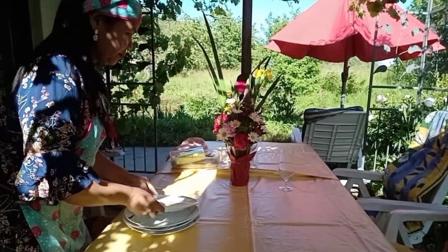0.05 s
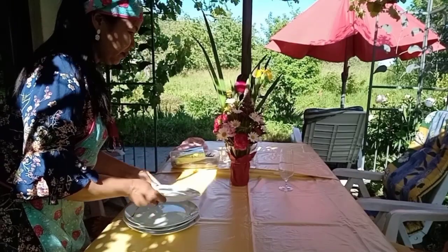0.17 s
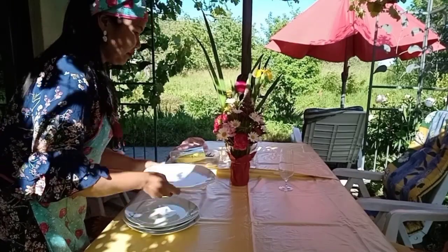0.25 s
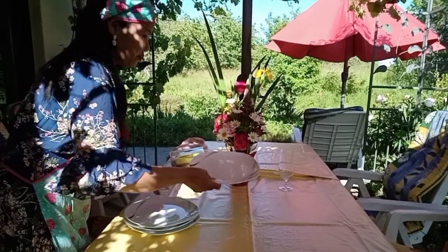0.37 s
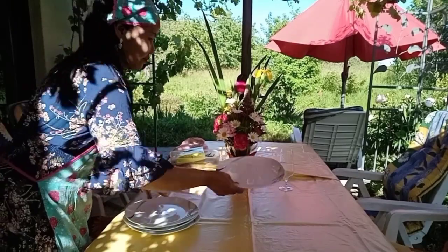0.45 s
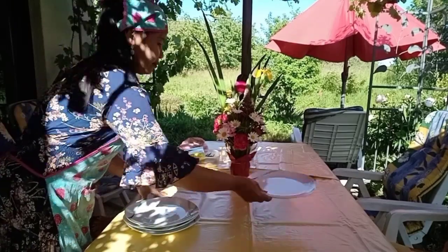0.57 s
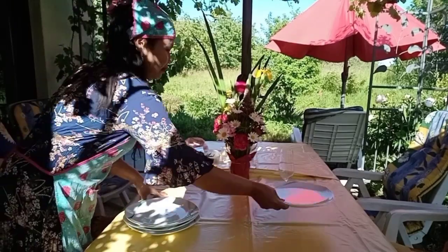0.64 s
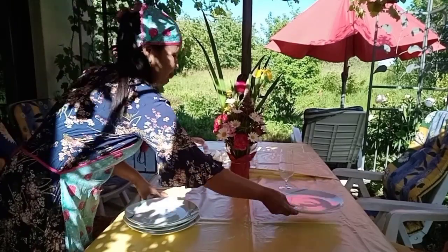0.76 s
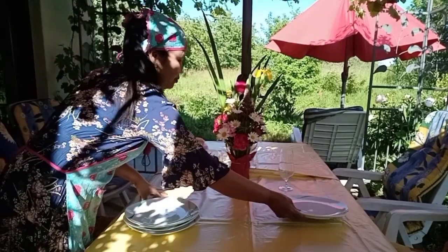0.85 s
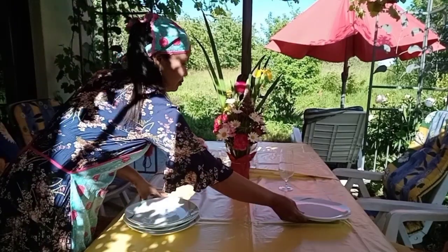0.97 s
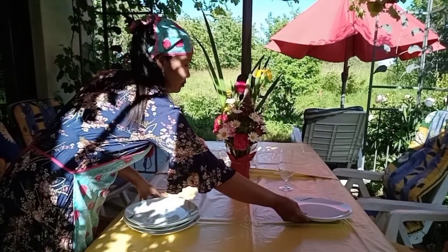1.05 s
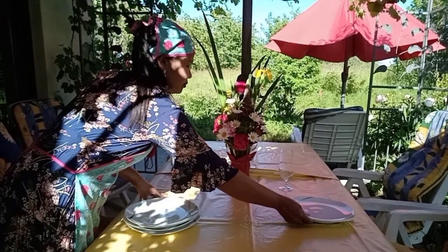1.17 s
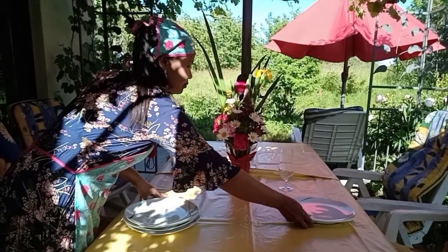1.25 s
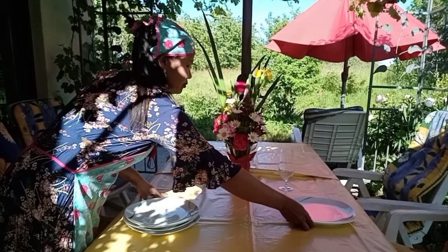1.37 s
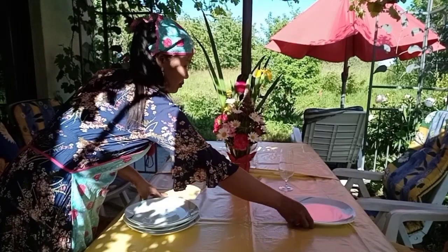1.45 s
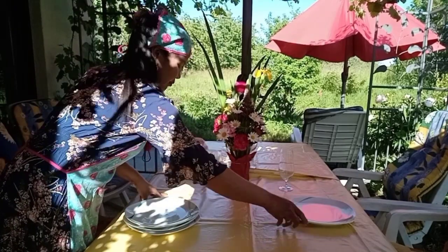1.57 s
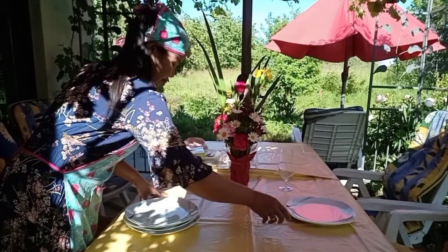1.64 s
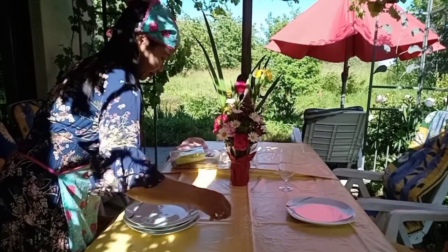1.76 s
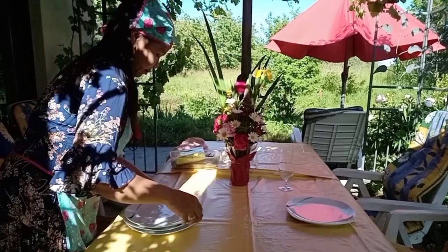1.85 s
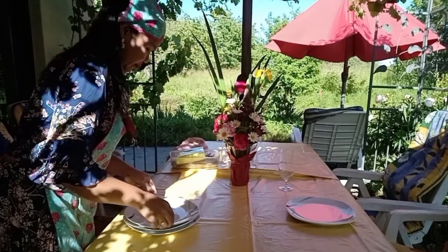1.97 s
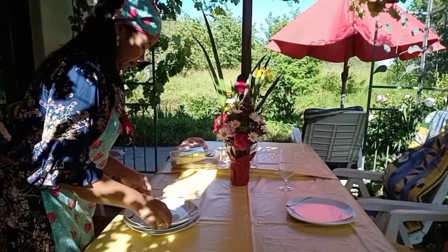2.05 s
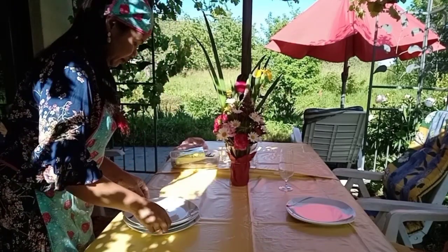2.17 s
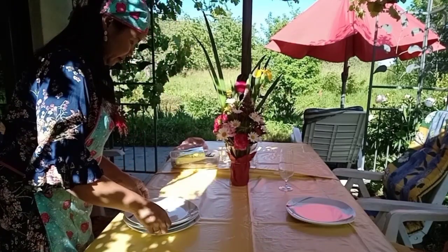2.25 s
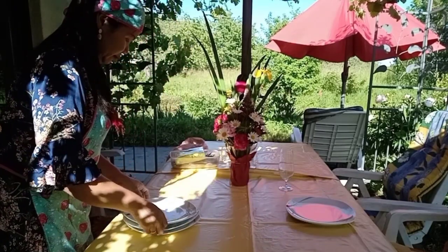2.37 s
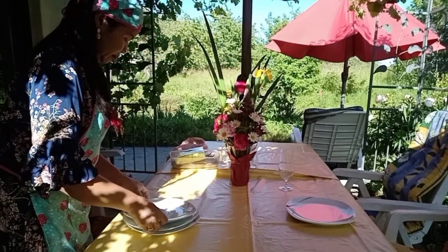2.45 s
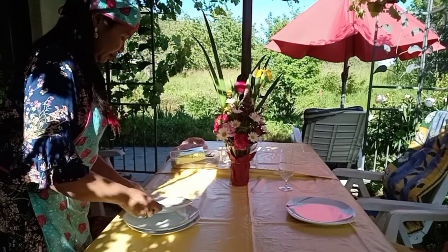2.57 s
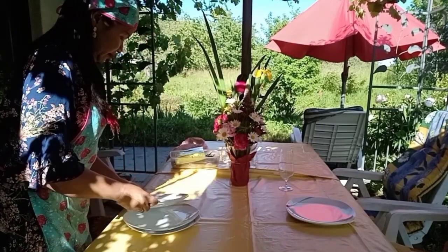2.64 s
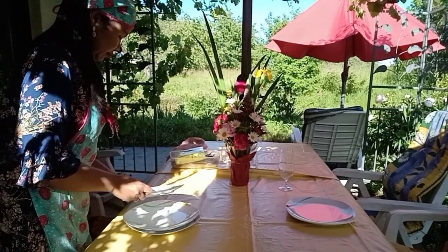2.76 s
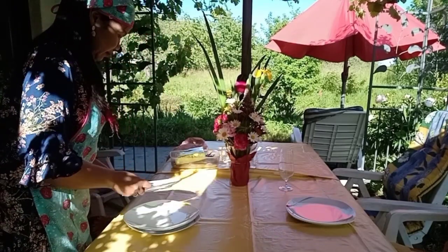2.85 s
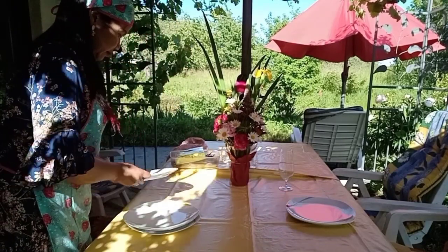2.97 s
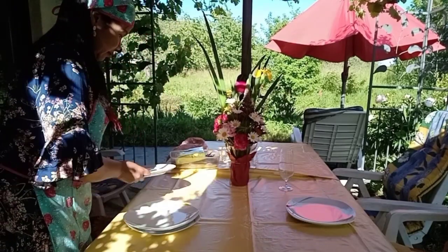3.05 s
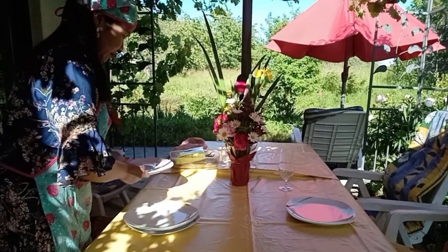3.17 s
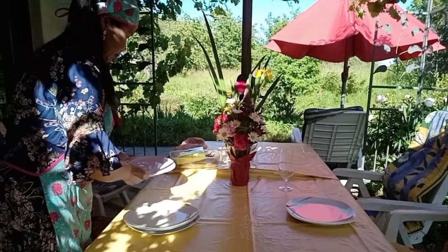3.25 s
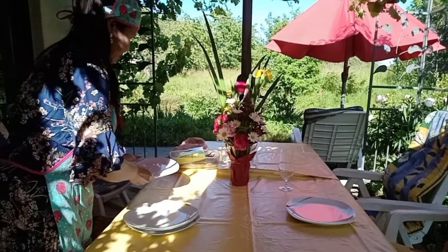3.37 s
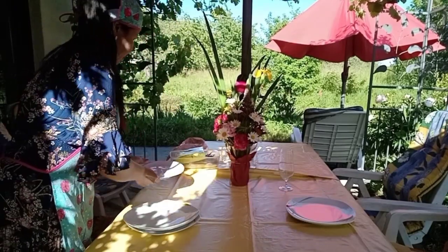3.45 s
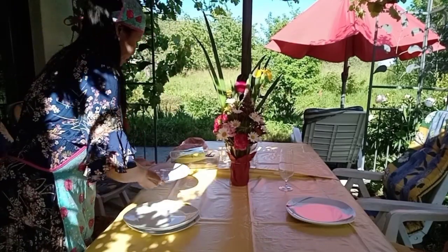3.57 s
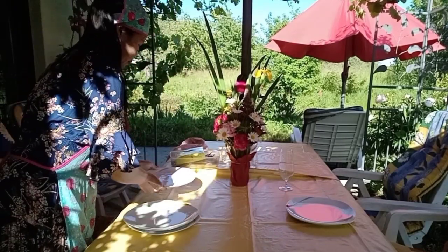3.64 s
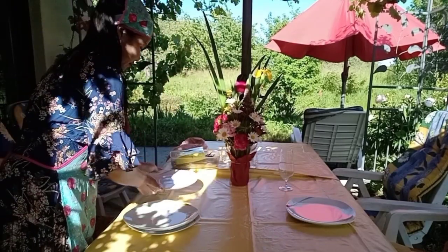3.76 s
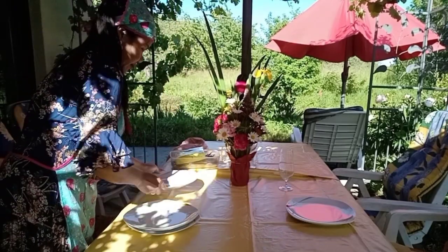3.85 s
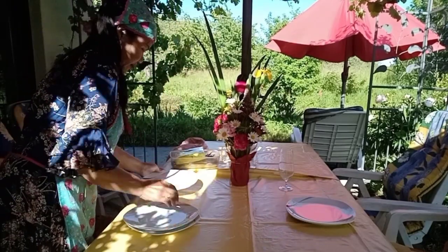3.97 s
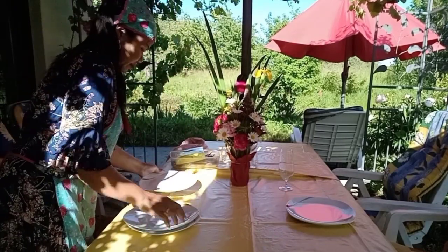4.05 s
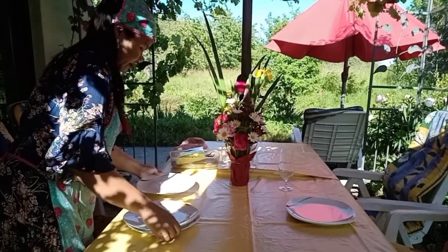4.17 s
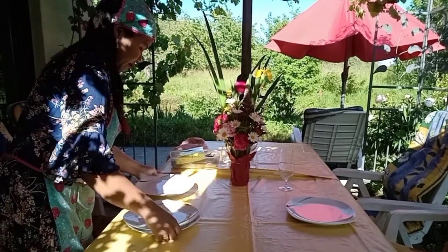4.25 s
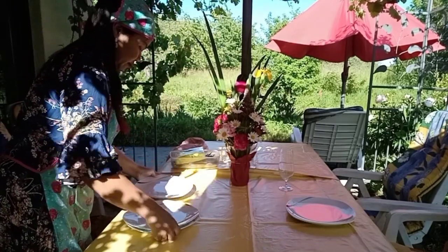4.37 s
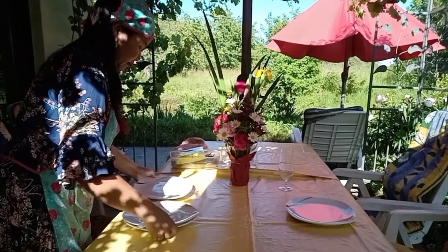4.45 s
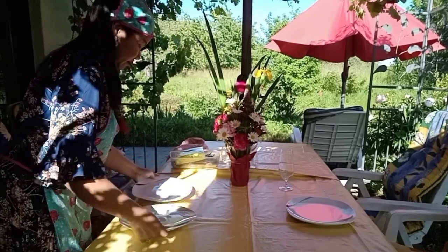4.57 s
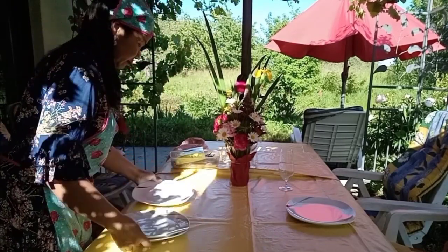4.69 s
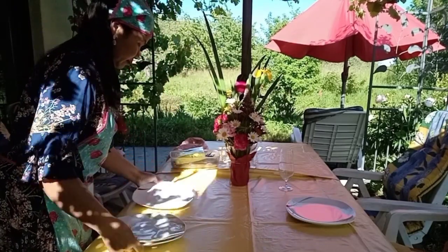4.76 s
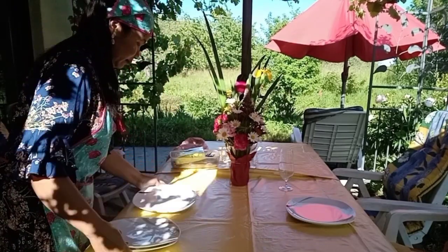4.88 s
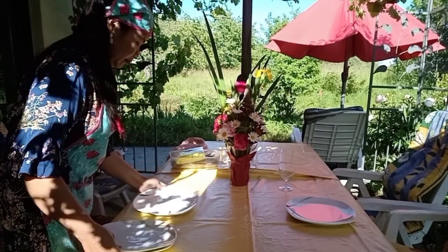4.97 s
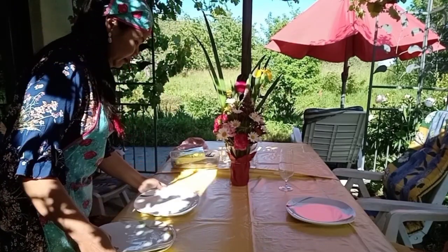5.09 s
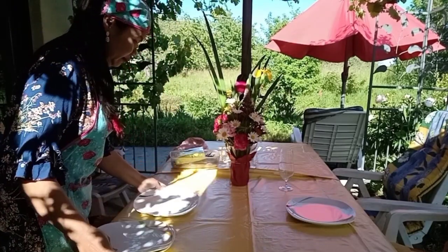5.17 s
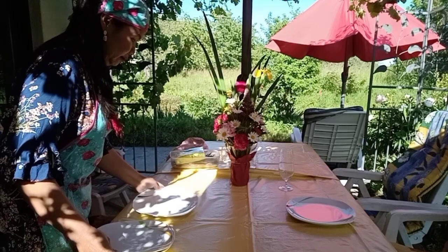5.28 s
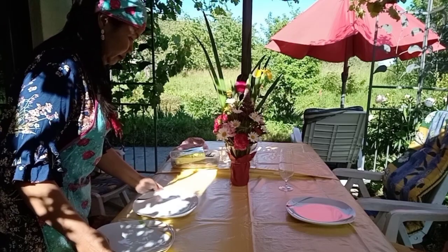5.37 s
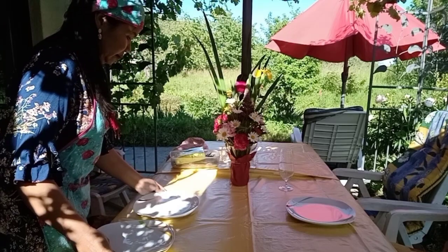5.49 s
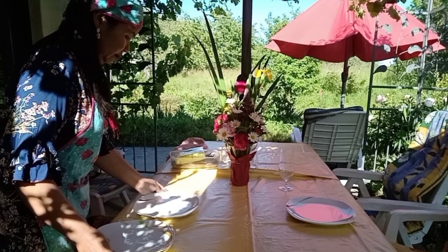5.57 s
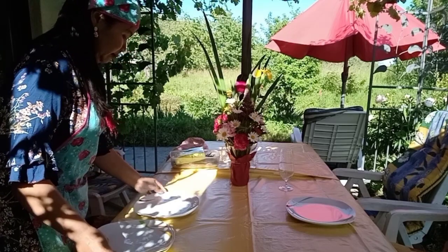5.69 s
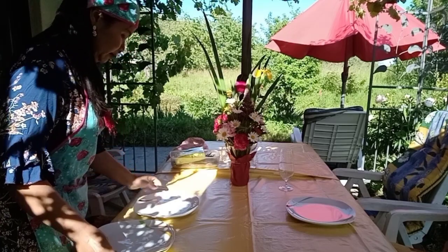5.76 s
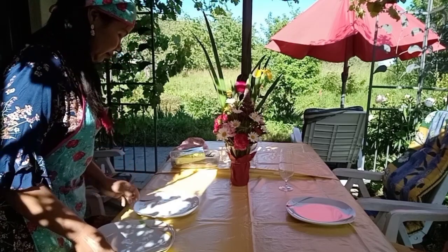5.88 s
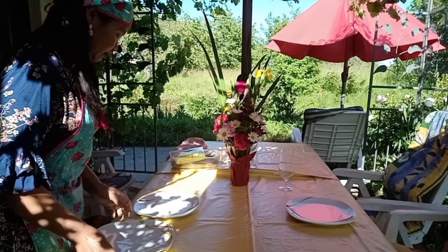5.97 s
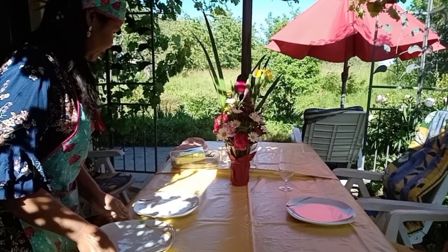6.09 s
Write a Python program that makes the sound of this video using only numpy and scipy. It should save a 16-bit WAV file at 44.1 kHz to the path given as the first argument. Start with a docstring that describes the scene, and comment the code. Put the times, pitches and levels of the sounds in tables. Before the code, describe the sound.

China dinner plates clink off a stack and thud onto a cloth-covered table outdoors, with a brief slide and small bird calls behind.

```python
"""On a garden veranda, china plates are lifted off a stack and laid on a cloth-covered table.
Rims clink (damped modes plus shaped noise), chatter and scrape (stick-slip); free rims sing on as sines.
The table top thuds (modes plus band noise); one plate is pushed across the oilcloth (hiss and rumble).
A small bird calls in pitch arches over soft garden noise; diffuse reflections surround plates and bird."""
import sys
import numpy as np
from scipy import signal
from scipy.fft import rfft, irfft, next_fast_len
from scipy.io import wavfile

SR = 44100
rng = np.random.default_rng(int(sys.argv[2]) if len(sys.argv) > 2 else 0)


def transcribe(u):
    """Save the signal u as a 16-bit wav file named by the first command-line argument.

    u: samples, shape (n,) or (channels, n), limited to [-1, 1]; the rate is SR.
    q: integer samples, one column per channel.
    """
    v = np.clip(np.atleast_2d(u).T, -1, 1)
    q = np.round(v * 32767).astype(np.int16)
    wavfile.write(sys.argv[1], SR, q)


N = 269892
AGE = np.arange(SR) / SR   # s since the start of a sound
BOOM_HZ, BOOM_T60_S = 145, 0.42   # what a clink wakes in the table top

# left-right likeness of near sound: (frequency [Hz], likeness [0-1])
NEAR_LIKENESS = [(100, 1), (1000, 0.86), (3000, 0.88), (8000, 0), (14000, 0.2)]
# left-right likeness of far sound: (frequency [Hz], likeness [0-1])
FAR_LIKENESS = [(30, 0.27), (100, 0.85), (500, 0.39), (1500, 0.15), (4000, 0.05), (12000, 0.086)]


def from_db(db):
    """Decibels to amplitude gain."""
    return 10 ** (np.asarray(db) / 20)


def rms_one(x):
    """Scale to unit power."""
    return x / np.sqrt(np.mean(x ** 2) + 1e-20)


def at_hz(points, hz):
    """Interpolate a table on a log-frequency axis."""
    table_hz, value = np.transpose(points)
    return np.interp(np.log(np.maximum(hz, 1)), np.log(table_hz), value)


def add(out, start_s, sound):
    """Mix a sound in at start_s."""
    start = max(0, round(start_s * SR))
    out[:, start:start + sound.shape[-1]] += sound[..., :N - start]


def dying(t60_s, rise_s=0.00027):
    """Quick rise times an exponential decay of 60 dB in t60_s."""
    return (1 - np.exp(-AGE / rise_s)) * np.exp(-np.log(1000) * AGE / t60_s)


def waver(count, size):
    """Random motion of unit spread that changes over `size` samples."""
    return rms_one(signal.fftconvolve(rng.standard_normal(count), np.hanning(size), "same"))


def noise(colour_db, likeness, size):
    """Stereo noise of unit power; colour_db maps Hz to dB, likeness sets the left-right correlation."""
    padded = next_fast_len(size)
    hz = np.fft.rfftfreq(padded, 1 / SR)
    mid, side = rfft(rng.standard_normal((2, padded)))
    alike = np.clip(at_hz(likeness, hz), 0, 1)
    both = np.sqrt(1 + alike) * mid + np.sqrt(1 - alike) * side * [[1], [-1]]
    return rms_one(irfft(both * from_db(colour_db(hz)), padded)[:, :size])


def causal(colour_db, x):
    """Minimum-phase filter with the given dB for each Hz: nothing sounds before its cause."""
    size = x.shape[-1]
    floored_db = np.maximum(colour_db(np.fft.rfftfreq(size, 1 / SR)), -110)
    # folding the cepstrum onto positive time gives minimum phase
    cepstrum = irfft(np.log(from_db(floored_db)), size)
    cepstrum[1:size // 2] *= 2
    cepstrum[size // 2 + 1:] = 0
    return irfft(rfft(x) * np.exp(rfft(cepstrum)), size)


def burst(colour_db, envelope):
    """Filtered noise as a crowd of damped modes, its energy set by the envelope alone."""
    sound = causal(colour_db, noise(np.zeros_like, NEAR_LIKENESS, SR) * envelope)
    return rms_one(sound) * np.sqrt(np.mean(envelope ** 2))


def ring(modes, colour_db, spread_db, skew_rad, scatter=1, damping=1.102):
    """Struck modes as decaying sines; every blow and each channel meets them a little differently."""
    out = np.zeros((2, SR))
    for hz, db, t60_s in modes:
        age = AGE[AGE < 1.3 * t60_s]
        phase = scatter * rng.uniform(-np.pi, np.pi) + skew_rad * rng.standard_normal((2, 1))
        gain = from_db(db + colour_db(hz) + spread_db * rng.standard_normal((2, 1)))
        build_up = 1 - np.exp(-(age * hz) ** 2)   # within about one cycle
        decay = np.exp(-np.log(1000) * damping * age / t60_s)   # one damping factor shortens every mode's decay
        out[:, :len(age)] += gain * np.sin(2 * np.pi * hz * age + phase) * build_up * decay
    return out


def garden(level_db=-61.5):
    """Far leaves: steady coloured noise, mostly unlike left to right."""
    # spectrum of the garden: (frequency [Hz], relative level [dB])
    garden_colour = [(15, -51.5), (25, -4), (53, -22.5), (104, -4.5), (322, -13.5), (359, -11.5), (666, -9),
                     (1300, -19.5), (1750, -13), (3090, -16.5), (5140, -21), (8130, -40), (8810, -49.5),
                     (13500, -39.5), (15500, -77)]
    return from_db(level_db) * noise(lambda hz: at_hz(garden_colour, hz), FAR_LIKENESS, N)


def contact(plate, clack_db, ring_db, bass_db, treble_db, clack_t60_s=0.096, linger_db=-10,
            linger_t60_s=0.14, ring_treble_db=2, bass_hz=600, treble_hz=3800):
    """One touch of china gives a dry clack and rings the plate; the touch sets bass and treble."""
    # ringing modes by plate: (frequency [Hz], relative level [dB], t60 before the damping factor [s])
    plate_modes = { "stack": [(472, -8.6, 0.19), (694, -7.6, 0.167), (930, 0.0, 0.125), (1039, -6.4, 0.118),
                   (1186, -10.2, 0.24), (1478, -9.8, 0.161), (1879, -6.7, 0.117), (1974, -3.0, 0.144),
                   (2082, -1.2, 0.108), (2566, -12.3, 0.154), (2680, -5.6, 0.132), (2782, -4.5, 0.12),
                   (3575, -15.8, 0.112), (4212, -19.2, 0.24), (4331, -17.8, 0.15), (4735, -15.3, 0.149),
                   (4932, -16.8, 0.147), (5157, -14.7, 0.106), (5626, -16.2, 0.099), (5857, -10.8, 0.104),
                   (6144, -14.3, 0.144), (6239, -15.2, 0.112), (6826, -16.8, 0.088), (7881, -24.8, 0.108),
                   (8537, -28.9, 0.07), (10153, -34.3, 0.062), (11193, -31.2, 0.072), (11370, -28.1, 0.085),
                   (12993, -34.4, 0.078), (13251, -32.6, 0.14)], "first": [(511, -11.7, 0.223),
                   (693, -5.9, 0.147), (799, -15.7, 0.24), (1323, -17.9, 0.164), (1406, -14.1, 0.14),
                   (1529, -18.3, 0.24), (1622, -9.3, 0.124), (2276, -5.5, 0.096), (2449, -10.6, 0.126),
                   (2581, -7.2, 0.131), (2661, -7.2, 0.24), (2750, 0.0, 0.122), (2895, -12.0, 0.117),
                   (3289, -22.2, 0.175), (3499, -17.9, 0.107), (3587, -20.9, 0.128), (3678, -18.5, 0.123),
                   (4114, -23.0, 0.152), (4284, -16.7, 0.218), (4414, -13.1, 0.125), (4574, -20.1, 0.217),
                   (5102, -29.7, 0.24), (5533, -16.2, 0.152), (5807, -25.9, 0.169), (7978, -44.8, 0.14),
                   (8335, -45.4, 0.24)], "second": [(513, -15.2, 0.24), (588, -14.8, 0.148),
                   (810, -2.9, 0.17), (910, -5.4, 0.141), (1230, -7.0, 0.141), (1487, -11.1, 0.177),
                   (1619, -7.8, 0.201), (1727, -7.5, 0.152), (1898, -7.7, 0.143), (2064, 0.0, 0.093),
                   (2153, -3.5, 0.1), (2470, -2.1, 0.24), (2569, -4.8, 0.221), (2720, -2.5, 0.147),
                   (2803, -6.6, 0.173), (2896, -4.7, 0.111), (3432, -15.6, 0.114), (3838, -13.5, 0.128),
                   (3923, -13.4, 0.14), (4031, -18.4, 0.168), (4437, -10.1, 0.094), (4718, -16.8, 0.126),
                   (5035, -13.2, 0.24), (5472, -11.3, 0.107), (5962, -16.7, 0.111), (6231, -14.9, 0.105),
                   (6608, -18.9, 0.114), (7249, -23.5, 0.12), (8561, -28.2, 0.088), (9561, -30.8, 0.101)],
                   "held": [(511, -18.3, 0.204), (647, -14.4, 0.126), (1568, -19.1, 0.189),
                   (1674, -18.0, 0.21), (1813, -17.4, 0.168), (1898, -17.4, 0.122), (2273, -15.0, 0.18),
                   (2464, 0.0, 0.148), (2619, -8.6, 0.165), (2700, -6.7, 0.124), (2774, -10.6, 0.128),
                   (3289, -13.6, 0.147), (3973, -22.8, 0.175), (4237, -23.5, 0.24), (4336, -21.7, 0.128),
                   (5036, -28.5, 0.24), (5218, -30.0, 0.216), (6033, -29.5, 0.163)],
                   "laid": [(564, -10.6, 0.118), (715, -8.3, 0.112), (838, -8.9, 0.168),
                   (1300, -15.4, 0.154), (1612, -1.6, 0.107), (1692, -13.5, 0.19), (1829, -6.8, 0.105),
                   (1981, 0.0, 0.098), (2471, -9.0, 0.23), (2585, -0.5, 0.084), (2689, -1.9, 0.1),
                   (2767, -6.6, 0.147), (3273, -16.4, 0.119), (4047, -19.0, 0.131), (4138, -16.6, 0.171),
                   (4382, -21.9, 0.105), (4945, -30.7, 0.24), (5482, -20.9, 0.135), (5698, -27.8, 0.168),
                   (6036, -30.5, 0.179), (7294, -35.6, 0.145), (7823, -39.6, 0.166)]}
    # quickly damped crowd of modes by plate: (frequency [Hz], relative level [dB])
    clack_colour = { "stack": [(59, -49), (100, -22.5), (1020, -7), (1760, -10), (2040, -7), (2420, -15.5),
                    (2750, -9), (3770, -22.5), (5070, -19.5), (6950, -29.5), (9340, -48), (13400, -58),
                    (15500, -97)], "first": [(59, -49.5), (100, -15), (668, 0.5), (936, -5.5), (1620, 1.5),
                    (1880, -8), (2750, -3), (3180, -31), (4460, -20), (6390, -28.5), (7410, -61),
                    (8230, -49), (15500, -86)], "second": [(59, -53), (100, -17), (668, -15), (825, 1.5),
                    (1090, -9), (2270, -5), (2520, 1.5), (2930, -14), (3180, -16), (6000, -22),
                    (7890, -34.5), (14200, -41), (15500, -41)], "held": [(59, -52.5), (100, -30.5),
                    (362, -21), (654, -11.5), (917, -23), (1370, -18), (2130, -20.5), (2520, -5),
                    (2930, -17), (4750, -29), (5630, -28.5), (8950, -71.5), (15500, -62.5)],
                    "laid": [(59, -52), (100, -22), (394, -24), (508, -12), (774, -6.5), (1020, -14),
                    (1620, -11.5), (2270, -8.5), (2630, -7.5), (3050, -22.5), (5630, -30), (8950, -61),
                    (15500, -67)]}
    envelope = np.hypot(dying(clack_t60_s, rise_s=0.00047), from_db(linger_db) * dying(linger_t60_s))

    def treble(hz):
        return 1 - 1 / (1 + (hz / treble_hz) ** 4)

    def touch_db(hz):
        return bass_db / (1 + (hz / bass_hz) ** 2) + treble_db * treble(hz)

    clack = burst(lambda hz: at_hz(clack_colour[plate], hz) + touch_db(hz), envelope)
    tone = ring(plate_modes[plate], lambda hz: touch_db(hz) + ring_treble_db * treble(hz),
                spread_db=1, skew_rad=.35)
    return from_db(clack_db) * clack + from_db(ring_db) * tone


def table_blow(centre_hz, t60_s, octave_db=6, modes_db=-4, knock_db=-2, lowest_hz=85):
    """The cloth cushions a blow, so only a band of the table's modes answers, all starting together."""
    # table-top modes: (frequency [Hz], relative level [dB], t60 before the damping factor [s])
    table_modes = [(102.1, 1.5, 0.33), (134.6, -4.5, .25), (191.6, -4.5, .2), (220.1, -3, 0.34),
                   (305, -10.5, 0.095), (358.3, -1.5, 0.12), (434, -2.5, 0.1), (479, -4, 0.11),
                   (684, -8.5, .12)]

    def cushion_db(hz):
        return -octave_db * np.log2(np.maximum(hz, 1) / centre_hz) ** 2

    def radiated_db(hz):   # steep loss below the lowest mode
        return cushion_db(hz) - 10 * np.log10(1 + (lowest_hz / np.maximum(hz, 1)) ** 10)

    knock = burst(radiated_db, dying(t60_s, rise_s=0.00059))
    boom = ring(table_modes, cushion_db, spread_db=.6, skew_rad=.08, scatter=0)
    return from_db(knock_db) * knock + from_db(modes_db) * boom


def clinks():
    """Rims touch, the table top booms under them, and a free rim sings on in one mode."""
    # rim contacts: (time [s], plate, clack [dB], ring [dB], bass [dB], treble [dB], table boom [dB])
    rim_contacts = [(0.001, "stack", -37, -34.5, -11.5, -12.5, -46.5),
                    (0.125, "stack", -20.5, -22, 0.5, 1.5, -42),
                    (0.222, "stack", -47, -42.5, 9, -15, -69.5),
                    (0.253, "first", -23.5, -35.5, 0, 6.5, -50.5),
                    (1.110, "first", -29.5, -17.5, -4, -8, -35.5),
                    (1.114, "first", -25.5, -34.5, 11.5, 16.5, -45),
                    (1.128, "first", -28.5, -36, -3, 14, -50), (2.127, "first", -57, -61, -14, 33, -80),
                    (2.170, "first", -64, -63.5, -20, 30, -80), (2.266, "stack", -49, -69, -5, 17, -67),
                    (2.387, "stack", -51.5, -74, 23, -22, -67), (2.432, "stack", -29.5, -38, -8, -4.5, -62),
                    (2.448, "second", -35.5, -46, 12, -7, -49), (2.671, "second", -21.5, -27.5, 4, 4, -57),
                    (4.686, "laid", -34.5, -48, 3, -20, -68), (4.696, "laid", -35.5, -34.5, 5, -5.5, -68),
                    (4.72, "laid", -24, -22, 0.5, 3.5, -57), (5.562, "laid", -37, -42.5, 5, 5, -47.5),
                    (5.826, "stack", -54, -75, 15, -1, -55.5)]
    # singing rims: (time [s], frequency [Hz], level [dB], t60 [s])
    singing_rims = [(0.252, 1778, -35, 0.85), (1.111, 1779, -39, 0.83), (2.128, 1780, -58, 0.51),
                    (2.671, 1605, -39, 0.39), (3.12, 3900, -65.5, 0.7), (5.563, 1560, -38, 0.14)]
    out, boom = np.zeros((2, N)), table_blow(BOOM_HZ, BOOM_T60_S)
    for start_s, plate, clack_db, ring_db, bass_db, treble_db, table_db in rim_contacts:
        touch = contact(plate, clack_db, ring_db, bass_db, treble_db)
        add(out, start_s, touch + from_db(table_db) * boom)
    for start_s, hz, db, t60_s in singing_rims:
        add(out, start_s, from_db(db) * np.sin(2 * np.pi * hz * AGE) * dying(t60_s, rise_s=0.0024))
    return out


def slips(length_s, uneven_db=1.0, uneven_s=0.00083):
    """Stick and slip: rows (s, dB) that quicken and fade, each slip followed by a rebound."""
    gap_s, delay_s, settling = .04, 0.01296, .6   # quickens to a steady pace as the plate gets moving
    fade_db = 13.5   # lost by the end, as the hand takes the weight
    rebound_s, rebound_db = .02, -4   # the rim drops back after each slip
    rows, age_s = [], 0
    while age_s < length_s:
        db = -fade_db * (age_s / length_s) ** 2
        rows += [(age_s, db), (age_s + rebound_s, db + rebound_db)]
        age_s += gap_s + delay_s
        delay_s *= settling
    return rows + rng.standard_normal((len(rows), 2)) * [uneven_s, uneven_db]


def scrape(slip_t60_s=0.062, sustain_db=-7.5, sustain_t60_s=.25, dull_hz=3500):
    """A foot ring sticks and slips on the glaze; each slip is a short rub through plate resonances."""
    # a rim judders over the plate below: (start [s], length [s], level [dB], tilt [dB/octave])
    rim_judders = [(0.349, 0.2, -48, -1), (2.787, .43, -44.5, 2.5)]
    # resonances of the rubbed plates: (centre [Hz], half-width [Hz], relative level [dB])
    rub_resonances = [(451, 30, 3.5), (758, 22, -2), (1422, 15, -3.5), (1600, 23, -6), (1950, 74, -15),
                      (2440, 75, -10.5), (2687, 16, -2.5), (4050, 84, -33.5)]
    out = np.zeros((2, N))
    envelope = np.hypot(dying(slip_t60_s, rise_s=0.0009), from_db(sustain_db) * dying(sustain_t60_s))

    def resonance_db(hz):
        return 10 * np.log10(sum(from_db(db) ** 2 / (1 + ((hz - centre_hz) / width_hz) ** 2) ** 0.97
                                 for centre_hz, width_hz, db in rub_resonances))

    for start_s, length_s, level_db, tilt_db in rim_judders:
        def colour_db(hz):
            octaves = np.log2(np.maximum(hz / rub_resonances[0][0], 1))
            return resonance_db(hz) + tilt_db * octaves - 10 * np.log10(1 + (hz / dull_hz) ** 2)

        power = 0
        for slip_s, slip_db in slips(length_s):
            power = power + (from_db(slip_db) * np.interp(AGE - slip_s, AGE, envelope)) ** 2
        add(out, start_s, from_db(level_db) * burst(colour_db, np.sqrt(power)))
    return out


def bird(low_hz=2750, waver_hz=200, flutter_db=3, release_s=0.012, arch_power=1.6):
    """A thin, husky whistle: notes swell as they climb, hold as they fall; pitch and strength waver."""
    # bird calls: (time [s], phrase, level [dB])
    bird_calls = [(0.501, "slur", -65), (0.752, "twitter", -55), (1.56, "slur", -58.5),
                  (1.837, "twitter", -51.5), (2.585, "twitter", -63.5), (2.962, "slur", -58),
                  (3.329, "twitter", -51.5), (3.585, "slur", -58), (4.21, "slur", -66.5)]
    # pitch arches by phrase: (time into phrase [s], rise [s], fall [s], top [Hz], level [dB])
    phrase_notes = {"twitter": [(0, .044, .032, 5097, -0.5), (.069, .035, 0.035, 3845, 3)],
                    "slur": [(0, .006, .105, 4900, -6.5)]}
    out = np.zeros((2, N))
    for start_s, phrase, db in bird_calls:
        for offset_s, rise_s, fall_s, top_hz, note_db in phrase_notes[phrase]:
            age = AGE[AGE < rise_s + fall_s]
            climb = np.interp(age, [0, rise_s, rise_s + fall_s], [0, 1, 0])
            height = np.sin(np.pi / 2 * climb) ** arch_power
            # each arch starts and ends around low_hz
            pitch_hz = low_hz + (top_hz - low_hz) * height + waver_hz * waver(SR, size=90)[:len(age)]
            envelope = np.minimum(age / rise_s, 1) * np.minimum(age[::-1] / release_s, 1)
            flutter = flutter_db * waver(SR, size=300)[:len(age)]
            strength = envelope * from_db(db + note_db + flutter)
            add(out, start_s + offset_s, strength * np.sin(2 * np.pi * np.cumsum(pitch_hz) / SR))
    return out


def thuds(rock_gap_s=.0166, rock_loss_db=2, uneven_octaves=0.21):
    """A blow lands on the table; a rocking plate repeats it, weaker, each time on a softer or harder spot."""
    # table blows: (time [s], level [dB], centre [Hz], t60 [s], time spent rocking [s])
    table_blows = [(1.102, -19, 490, 0.1, 0), (1.110, -31, 226, 0.27, 0), (1.199, -44.5, 280, 0.055, .025),
                   (2.806, -46, 332, .098, 0), (3.981, -42, 260, .07, 0), (3.990, -30, 277, 0.073, .108),
                   (5.015, -49.5, 150, .3, 0), (5.143, -51, 169, 0.14, 0), (5.537, -38, 150, .073, 0)]
    out = np.zeros((2, N))
    for start_s, db, centre_hz, t60_s, rocking_s in table_blows:
        for k in range(1 + int(rocking_s / rock_gap_s)):
            spot_hz = centre_hz * 2 ** (uneven_octaves * rng.standard_normal() * (k > 0))
            blow = from_db(db - k * rock_loss_db) * table_blow(spot_hz, t60_s)
            add(out, start_s + k * rock_gap_s, blow)
    return out


def chatter(start_s=4.468, gap_s=.0079, loss_db=0.9, count=6, table_db=-48):
    """A held plate bounces on its neighbour in a steady, weakening run; the first touch reaches the table."""
    out = np.zeros((2, N))
    add(out, start_s, from_db(table_db) * table_blow(BOOM_HZ, BOOM_T60_S))
    for k in range(count):
        touch = contact("held", clack_db=-27.5, ring_db=-25, bass_db=2, treble_db=2.5)
        add(out, start_s + k * gap_s, from_db(-k * loss_db) * touch)
    return out


def slide(hiss_db=-52, rumble_db=-56, grain=0.18, rumble_follows=0.59):
    """Oilcloth hisses unevenly under a pushed plate and the table top rumbles; both follow its speed."""
    # oilcloth hiss: (frequency [Hz], relative level [dB])
    hiss_colour = [(180, -34), (300, -12), (571, -1.5), (744, -11), (937, -5.5), (1330, -9), (2360, 1.5),
                   (3400, -4.5), (5130, -0.5), (9290, -26), (13600, -15.5), (15500, -20)]
    # table rumble under it: (frequency [Hz], relative level [dB])
    rumble_colour = [(35, -50), (60, -13), (108, 6), (183, -9), (223, 3.5), (286, -14), (500, -17),
                     (650, -51), (1100, -120)]
    start_s, attack_s, hold_s, fade_db_per_s = 4.76, .02, .32, 124   # hold counts from the start
    age = np.arange(N) / SR - start_s
    speed = np.clip(age / attack_s, 0, 1) * from_db(-fade_db_per_s * np.maximum(age - hold_s, 0))
    hiss = noise(lambda hz: at_hz(hiss_colour, hz), NEAR_LIKENESS, N)
    hiss = hiss * (1 + grain * waver(N, size=200))
    rumble = noise(lambda hz: at_hz(rumble_colour, hz), NEAR_LIKENESS, N)
    return from_db(hiss_db) * speed * hiss + from_db(rumble_db) * speed ** rumble_follows * rumble


def from_left(x, lead_s=6.8e-5, pan_db=0.2, shade_db=3, shade_hz=5000):
    """The plates lie to the left, so the right channel is a little later and duller."""
    hz = np.fft.rfftfreq(N, 1 / SR)
    lean_db = pan_db + shade_db / 2 * hz ** 2 / (hz ** 2 + shade_hz ** 2)   # up on the left, down on the right
    lag = np.exp(-2j * np.pi * hz * lead_s)
    return irfft(rfft(x) * np.array([from_db(lean_db), from_db(-lean_db) * lag]), N)


def veranda(x, build_s=0.0047):
    """Diffuse reflections off wall, roof and floor: noise bands, each with its own decay."""
    # veranda decay: (frequency [Hz], t60 [s])
    veranda_decay = [(120, 0.64), (600, 0.51), (2500, 0.4), (6000, 0.47), (14000, 0.38)]
    wash, tail = noise(np.zeros_like, FAR_LIKENESS, SR), 0
    edges_hz = np.geomspace(60, 16000, 9)
    for low_hz, high_hz in zip(edges_hz, edges_hz[1:]):
        band_filter = signal.butter(2, [low_hz, high_hz], "band", fs=SR, output="sos")
        t60_s = at_hz(veranda_decay, np.sqrt(low_hz * high_hz))
        tail = tail + signal.sosfilt(band_filter, wash) * dying(t60_s, build_s)
    return signal.fftconvolve(x, rms_one(tail) / np.sqrt(SR), axes=1)[:, :N]


def scene(room_db=-20, bird_dry_db=-5, bird_wet_db=-2):
    """Crockery close by, bird and leaves far off."""
    leaves = garden()
    table = from_left(clinks() + scrape() + thuds() + chatter() + slide())
    song = bird()
    near = table + from_db(room_db) * veranda(table)
    far = from_db(bird_dry_db) * song + from_db(bird_wet_db) * veranda(song)
    return near + far + leaves


def record(dry, cutoff_hz=15600):
    """A steep elliptic low-pass cuts the top."""
    return signal.sosfilt(signal.ellip(10, .2, 70, cutoff_hz, fs=SR, output="sos"), dry)


dry = scene()
out = record(dry)
transcribe(out)
```